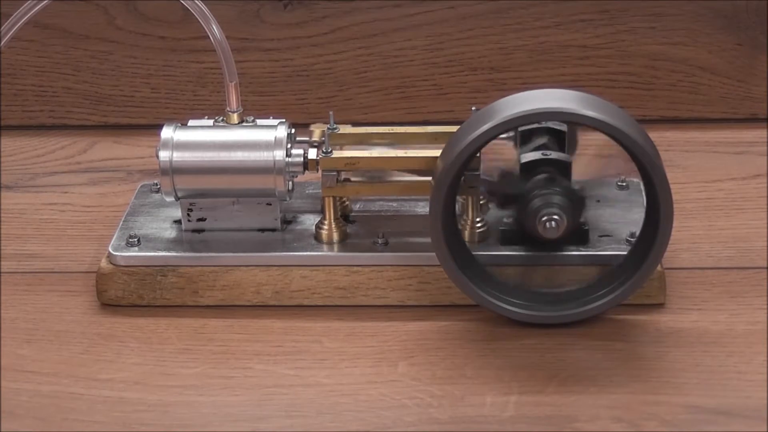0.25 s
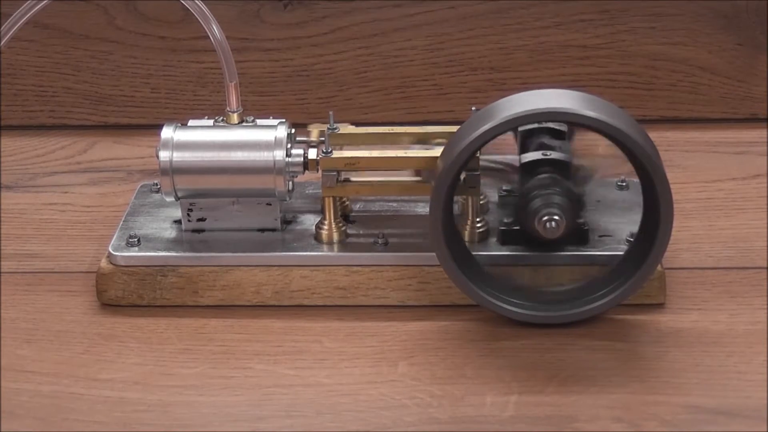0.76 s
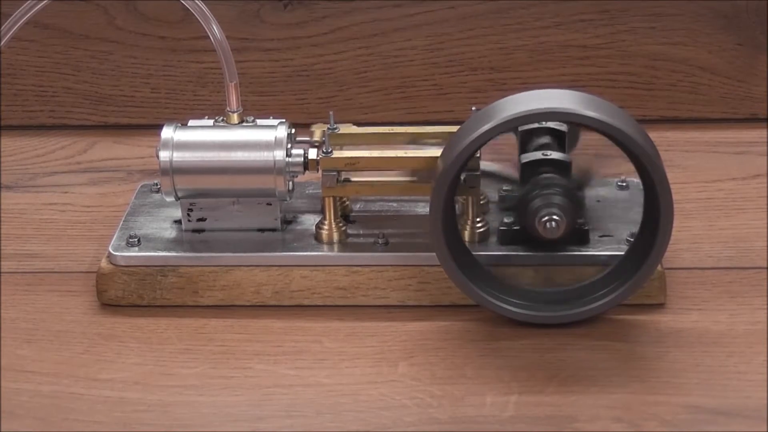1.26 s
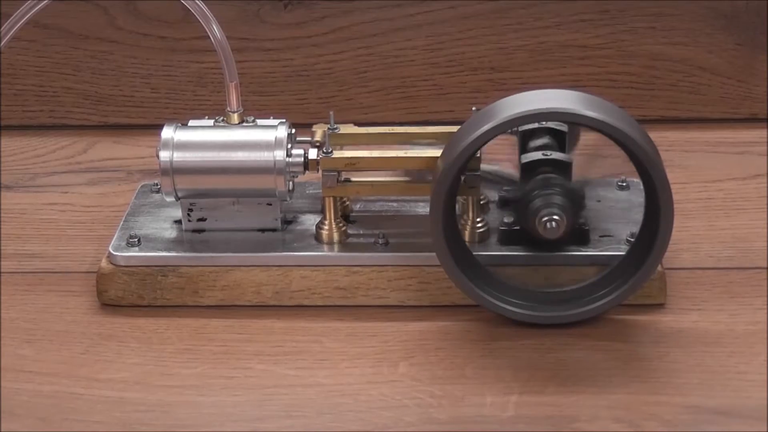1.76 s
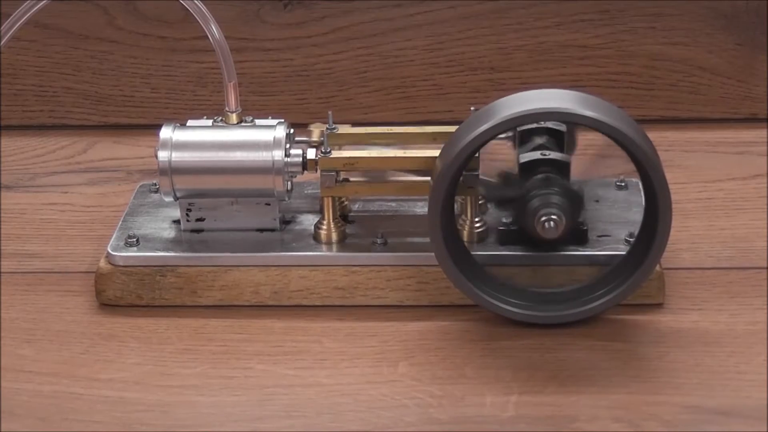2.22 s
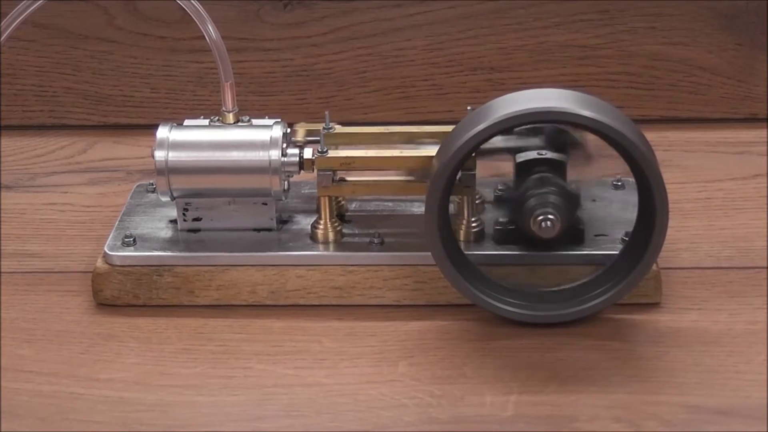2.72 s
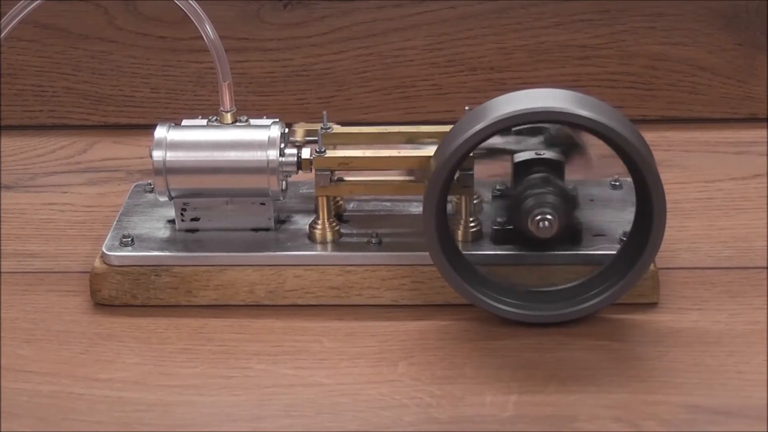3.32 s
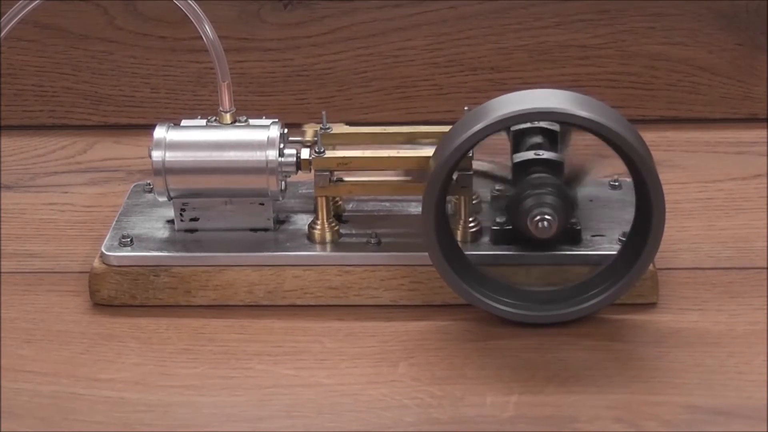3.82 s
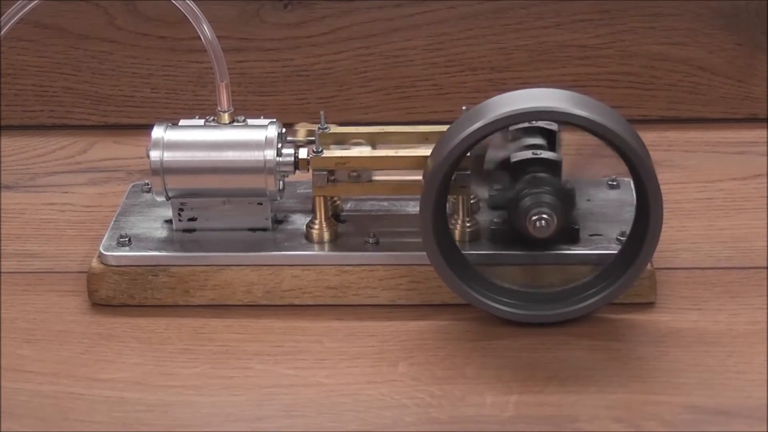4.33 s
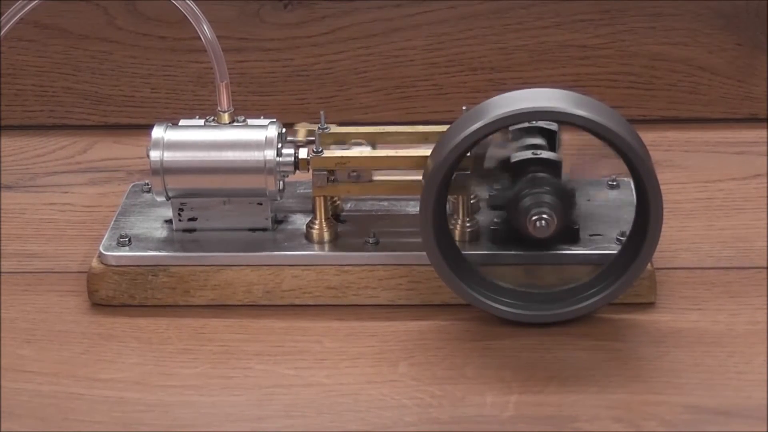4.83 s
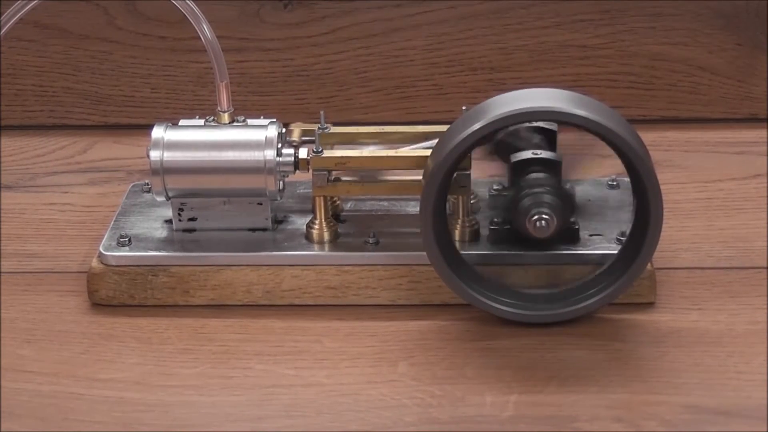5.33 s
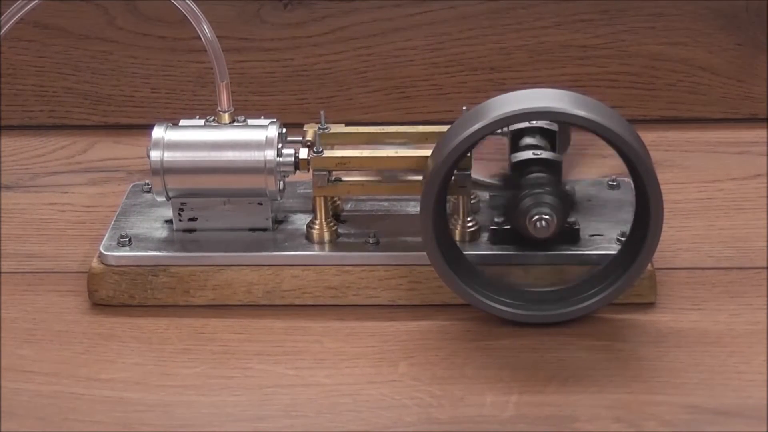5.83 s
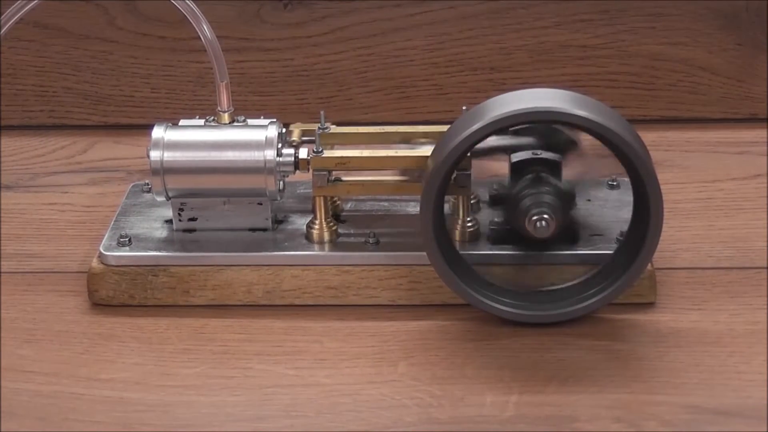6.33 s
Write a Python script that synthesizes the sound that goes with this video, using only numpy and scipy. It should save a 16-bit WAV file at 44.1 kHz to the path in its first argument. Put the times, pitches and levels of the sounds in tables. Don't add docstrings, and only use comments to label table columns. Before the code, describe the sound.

From 0 s a small air-driven piston engine is already running on a wooden bench, heard very close in stereo. Each turn has two bright hissing exhaust strokes of different colour: one broad and rushing with a faint whistle around 5 to 6 kHz, the other sharper and spitting, with airy jets near 9 kHz. A steady leak fills the gaps. Once per turn loose linkage gives a hollow, low-mid wooden knock, a brief base buzz, a small metallic ring and a very high doubled tick; low bumps sometimes jolt the microphone. The pace starts near five turns per second, climbs to nearly seven by 2 s, holds until about 3.8 s, then eases to about four and a half by 6.6 s, its hisses growing more uneven and lopsided. Knocks vary slightly in strength throughout. Hose reflections give a slight hollow tint; the room tail is short. It ends still running.

```python
import sys
import numpy as np
from scipy import signal
from scipy.fft import rfft, irfft
from scipy.io import wavfile
from scipy.ndimage import uniform_filter1d

SR = 44100
rng = np.random.default_rng(int(sys.argv[2]) if len(sys.argv) > 2 else 0)


def volts_from_decibels(level):
    exponent = np.asarray(level, float) / 20
    return 10 ** exponent


def store_wav(level_fs):
    pcm = np.round(np.clip(np.atleast_2d(level_fs), -1, 1) * 32767)
    wavfile.write(sys.argv[1], SR, pcm.T.astype(np.int16))


N = 289737
TIME, HZ = np.arange(N) / SR, np.fft.rfftfreq(N, 1 / SR)


def evened(x):
    return x / np.sqrt(np.mean(x ** 2) + 1e-20)


def read(points, hz):
    f, value = np.transpose(points)
    return np.interp(np.log(hz + 1), np.log(f + 1), value)


def hiss(gain, flutter_db, flutter_s, count=2):
    white = rng.standard_normal((count, N))
    noise = evened(irfft(rfft(white) * gain, N))
    span = max(int(flutter_s * SR), 2)
    flutter = uniform_filter1d(rng.standard_normal((count, N)), span)
    flutter = evened(uniform_filter1d(flutter, span))
    return evened(noise * volts_from_decibels(flutter_db * flutter))


def peaks(modes):
    power = 0
    for hz, width_hz, db in modes:
        power = power + volts_from_decibels(2 * db) / (1 + (2 * (HZ - hz) / width_hz) ** 2) ** 1.45
    return np.sqrt(power)


# (time [s], speed [turns/s])
SPEED = [
    (0, 4.975),
    (.6, 5.704),
    (1.1, 5.898),
    (2, 6.685),
    (2.8, 6.735),
    (3.8, 6.692),
    (4.5, 6.331),
    (5.1, 6.059),
    (5.9, 5.311),
    (6.6, 4.499),
]


def crank():
    start_turns = -.376
    return start_turns + np.cumsum(np.interp(TIME, *np.transpose(SPEED))) / SR


# (time [s], favour to front end [dB], supply pressure [dB])
FAVOUR = [(0, -0.5, 0.5), (.5, .5, 0.3), (.95, -2, -1), (1.25, 2, 0.5), (1.7, 0.5, -.5), (2.1, 2.5, -.5),
          (2.45, .5, .6), (3.1, 1, 0.3), (3.6, 1.5, .1), (3.9, -0.5, -1), (4.25, 0.5, 1.2), (4.7, 0.5, -.2),
          (5.05, -2.5, 0.2), (5.3, -2.5, 1.4), (5.7, -1.5, .5), (6.05, -4.5, -1.1), (6.3, -2.5, 0.2),
          (6.6, -6.5, -0.3)]


def vent(db, favour, scatter_db, flow, first_turns):
    half_turns = 2 * (crank() - first_turns)
    stroke = (half_turns // 2).astype(int) + 2
    s, favour_db, supply_db = np.transpose(FAVOUR)
    air_db = np.interp(TIME, s, favour * favour_db + supply_db)
    chance_db = scatter_db * rng.standard_normal(stroke.max() + 1)[stroke]
    flow_db = np.interp(half_turns % 2, *np.transpose(flow))
    return volts_from_decibels(db + air_db + chance_db + flow_db)


# (time since opening [half turns], level [dB])
FRONT_FLOW = [(0, -18), (.02, 0.5), (.12, -1), (.65, 1.5), (.8, -0.5), (.95, -5), (1.3, -8.5), (2, -16.5)]
PASSAGE_FLOW = [(0, -37), (.08, -7), (.25, 0.5), (.62, 1.5), (.8, -6), (1.05, -7), (1.6, -19), (2, -21)]
BACK_FLOW = [(0, -7), (.05, -0.5), (.25, 1.5), (.55, -3.5), (.8, -1.5), (.95, -7.5), (1.1, -8), (2, -35)]
JET_FLOW = [(0, -37), (.04, 7), (.12, 2.5), (.45, -3.5), (.7, 1), (.8, 3.5), (.9, -17), (1.05, 0), (2, -61)]
# (frequency [Hz], density [dB per Hz])
FRONT_BODY = [(150, -41), (900, -15.5), (1400, -10.5), (2050, -8), (2350, -1.5), (2600, 0.5), (3050, -3),
              (3400, 2), (3700, 1), (4400, 0), (5200, -6), (6800, -1.5), (8000, -17.5)]
FRONT_TREBLE = [(6200, -20), (7200, -3.5), (8800, -3), (9700, 3.5), (10500, -2), (11500, -1.5),
                (12700, -2.5), (14000, -6.5), (14900, -9.5), (15600, -9)]
BACK_BODY = [(150, -10.5), (1000, -13), (1400, -13), (2050, -15.5), (2350, -0.5), (2600, 1.5), (3050, -2),
             (3450, 4.5), (3800, 2.5), (4400, -2), (5000, -8), (6800, -5.5), (8000, -8.5)]
BACK_TREBLE = [(6200, -15.5), (7300, 7.5), (8300, 1), (10500, -2), (11500, 6), (12800, -4), (14000, -11),
               (14900, -5), (15600, 2.5)]
LEAK = [(60, -20), (150, -13), (400, -7.5), (1000, -17), (2000, -9), (3600, -12.5), (5500, -7.5),
        (7000, -8.5), (9200, 4.5), (11500, -6), (14000, -8.5), (14900, -22), (15600, -23)]
# (frequency [Hz], width [Hz], level [dB])
PASSAGE = [(5824, 220, -1.5), (5536, 340, -4), (6095, 300, -2.5), (5105, 46, 2.5)]
JET = [(9680, 570, -9.5), (9880, 250, -8), (9030, 140, -7.5), (8120, 150, -11)]


def exhaust():
    front = vent(-38, -0.21, 0.43, FRONT_FLOW, 0) * hiss(volts_from_decibels(read(FRONT_BODY, HZ)), 1.5, 0.0037)
    front += vent(-35.5, 0.14, 0.32, FRONT_FLOW, -.025) * hiss(volts_from_decibels(read(FRONT_TREBLE, HZ)), 1.5, 0.0028)
    front += vent(-39.5, 0.88, 0.62, PASSAGE_FLOW, 0) * hiss(peaks(PASSAGE), 0.95, 0.004)
    back_turns = 0.493
    back = vent(-39.5, -.3, 0.86, BACK_FLOW, back_turns) * hiss(volts_from_decibels(read(BACK_BODY, HZ)), 0.71, 0.0021)
    back += vent(-41.0, 0.074, 1.8, BACK_FLOW, back_turns) * hiss(volts_from_decibels(read(BACK_TREBLE, HZ)), 0.94, 0.0014)
    back += vent(-38.5, -0.34, 0.87, JET_FLOW, back_turns) * hiss(peaks(JET), 1.2, 0.0022)
    leak = volts_from_decibels(-41) * hiss(volts_from_decibels(read(LEAK, HZ)), 2.95, 0.032)
    return front + back + leak


def ring(modes, rise_s=1e-5, length_s=.3):
    t = np.arange(int(length_s * SR)) / SR
    sines = sum(volts_from_decibels(db - 60 * t / t60) * np.sin(2 * np.pi * hz * t) for hz, db, t60 in modes)
    return (1 - np.exp(-t / rise_s)) * sines


def blows(seconds, sizes):
    train = np.zeros(N)
    at = np.clip((np.asarray(seconds) * SR).astype(int), 0, N - 1)
    np.add.at(train, at, sizes)
    return train


# (frequency [Hz], width [Hz], level [dB])
RATTLE = [(408, 150, -2.5), (514, 164, 0), (1270, 2000, -11.5)]


def rattle(s, upper_db):
    last = np.searchsorted(s, TIME) - 1
    since_s = TIME - s[last]
    hold_turns, stop_turns = 0.46, 0.11
    past_turns = since_s * np.interp(TIME, *np.transpose(SPEED)) - hold_turns
    shake = volts_from_decibels(upper_db[last] + 6 - 60 * since_s / 0.73)
    shake = shake * (1 - np.exp(-since_s / 0.0084)) / (1 + np.exp(past_turns / stop_turns))
    return volts_from_decibels(-6) * shake * hiss(peaks(RATTLE), 2.6, 0.01, count=1)[0]


# (time [s], crosshead level [dB])
KNOCKS = [(-.06, -50), (0.687, -38.5), (1.0225, -43.5), (1.203, -53), (1.993, -44.5), (2.1433, -42),
          (2.4406, -43), (2.7347, -39.5), (3.034, -42), (3.9272, -51), (4.083, -52), (5.0334, -40),
          (5.193, -45), (5.3654, -39.5), (5.546, -46), (6.5167, -44.5)]
# (frequency [Hz], level [dB], t60 [s])
CROSSHEAD = [(1213, 3.5, 0.08), (1415, 10.5, 0.023), (1623, 1.5, 0.062), (1700, -3.5, 0.05),
             (2670, 2, 0.025), (3620, 1, 0.014)]
TICK = [(13170, -0.5, 0.0038), (12900, -6, .004), (12300, -5, .004), (13900, -11, .003), (11500, -16, .003),
        (7000, -27, .003)]
# (frequency [Hz], level [dB], t60 [s])
BASE_AGAINST = [(328.3, -6.5, 0.19), (413.6, -1.5, 0.21), (816, -14.5, 0.13)]
BASE_WITH = [(396, -11, 0.13), (451.2, -13, 0.4), (494.6, -7.5, 0.33), (553, -7.5, 0.12),
             (615.6, -5.5, 0.098), (152.4, -14, 0.22)]
JOLT_LAG_S = 0.00067


def knocks():
    jolt_tick_db = 2
    rows = [(s, db, 0) for s, db in KNOCKS]
    rows += [(row[0] - JOLT_LAG_S, row[1], jolt_tick_db) for row in JOLTS]
    s, head_db, extra_db = np.transpose(sorted(rows))

    def follow(usual_db, slope, scatter_db):
        return usual_db + slope * (head_db + 46) + scatter_db * rng.standard_normal(len(s))

    base_db = follow(-46, 0.16, 1.3)
    upper_db = follow(-45.5, 0.11, 0.74)
    tick_db = follow(-37.5, -0.18, 1.6)
    answer_s = s[:-1] + 0.51 * np.diff(s)
    answer = volts_from_decibels(2.0 * rng.standard_normal(len(answer_s)))
    heard = s > 0

    base = blows(s - .0008, heard * volts_from_decibels(base_db + 7.0))
    base += blows(answer_s, volts_from_decibels(-73) * answer)
    upper = blows(s - .0008, heard * volts_from_decibels(upper_db + 6.0))
    wood = signal.oaconvolve(upper, ring(BASE_WITH, 0.0023))[:N]
    wood -= signal.oaconvolve(base, ring(BASE_AGAINST, 0.0009))[:N]
    wood += rattle(s, upper_db)

    head = blows(s, heard * volts_from_decibels(head_db - 5.5))
    head += blows(answer_s, volts_from_decibels(-61) * answer)
    tick_size = heard * volts_from_decibels(tick_db + extra_db)
    tick = blows(s, volts_from_decibels(7.0) * tick_size)
    tick += blows(s + 0.0012, volts_from_decibels(7.5) * tick_size)
    tick += blows(answer_s, volts_from_decibels(-46.5) * answer)
    metal = signal.oaconvolve(head, ring(CROSSHEAD))[:N] + signal.oaconvolve(tick, ring(TICK))[:N]
    return wood, metal


def push(rise_s, cut_hz):
    u = np.arange(4000) / SR / rise_s
    x = signal.lfilter(*signal.butter(2, cut_hz / (SR / 2), "high"), u ** 1.4 * np.exp(-u))
    return x / x.max()


# (time [s], crosshead level [dB], left [pressure, full scale 1], right [pressure, full scale 1])
JOLTS = [(0.1338, -43.5, 0.024, -0.029), (0.3275, -48, 0.05, -0.069), (0.5108, -38, 0.021, -0.042),
         (0.8553, -48, 0.039, -0.044), (1.3656, -60, -0.1, 0.087), (1.529, -58, 0.02, -0.018),
         (1.6847, -54, 0.073, -0.087), (1.839, -50, 0.025, -0.027), (2.2862, -54, 0.008, -0.008),
         (2.5888, -48, -0.00054, -0.025), (2.8855, -38.5, -0.048, 0.041), (3.1815, -39.5, -0.061, 0.055),
         (3.3272, -61, 0.085, -0.1), (3.4829, -47.5, 0.029, -0.035), (3.6259, -44.5, 0.075, -0.095),
         (3.7808, -51, 0.007, -0.0043), (4.2378, -45, -0.0025, -0.00018), (4.3917, -42.5, -0.0027, 0.0011),
         (4.5498, -41.5, 0.038, -0.047), (4.7078, -48, 0.034, -0.04), (4.8697, -39.5, 0.072, -0.08),
         (5.7188, -51, -0.1, 0.093), (5.9113, -46.5, -0.0096, -0.018), (6.0995, -43, 0.012, -0.012),
         (6.3073, -65, 0.057, -0.075)]


def jolts():
    s, _, left, right = np.transpose(JOLTS)
    rocking = signal.oaconvolve(blows(s, (left - right) / 2), push(0.00057, 78))[:N]
    together = volts_from_decibels(6.0) * signal.oaconvolve(blows(s, (left + right) / 2), push(0.00081, 52))[:N]
    return np.array([together + rocking, together - rocking])


# (delay [s], share [ratio])
ECHOES = [
    (.0059, -.45),
    (.0118, .18),
]
# (frequency [Hz], level [dB])
RETURN = [(300, -27.5), (2000, -6), (6500, -2.5), (9000, -12), (16000, -16)]
# (frequency [Hz], side minus mid [dB])
APART = [(100, -13.5), (250, -33), (450, -18.5), (1000, -24), (1500, -21.5), (2700, -14.5), (3700, -13.5),
         (5000, -20), (5900, -16), (7000, -29), (8500, -19), (10000, -19), (11500, -6.5), (14500, -2.5)]
# (frequency [Hz], left minus right [dB])
LEAN = [(300, 0.5), (1500, -1), (5000, -0.9), (8000, 0), (15000, 3.5)]


def scene():
    direct, scattered = exhaust()
    wood, metal = knocks()
    t = np.arange(SR // 4) / SR
    t60_s = np.array([[.25], [.3], [.04]])
    tails = rng.standard_normal((3, len(t))) * volts_from_decibels(-60 * t / t60_s)
    room, bench, scatter = rfft(tails / np.linalg.norm(tails, axis=1, keepdims=True), N)
    hose = sum(share * np.exp(-2j * np.pi * HZ * delay_s) for delay_s, share in ECHOES)
    space = 1 + volts_from_decibels(read(RETURN, HZ)) * (hose + volts_from_decibels(-6.5) * room)
    mid = rfft(direct + metal) * space + rfft(wood) * (1 + volts_from_decibels(-12.5) * bench)
    side = rfft(scattered) * space
    side += rfft(volts_from_decibels(9.0) * wood + metal) * scatter / abs(scatter) ** 0.62
    side *= volts_from_decibels(read(APART, HZ))
    lean = volts_from_decibels(read(LEAN, HZ) / 2)
    low_cut_hz = 110
    low_cut = 1 / np.sqrt(1 + (low_cut_hz / (HZ + 1)) ** 8)
    pair = np.array([(mid + side) * lean, (mid - side) / lean])
    return irfft(low_cut * pair, N) + jolts()


def top_cut(x):
    return signal.sosfilt(signal.butter(12, 16860, fs=SR, output="sos"), x)


def record(dry):
    edge_hz = 15760
    low_pass = signal.firwin(1535, edge_hz, window=("kaiser", 9), fs=SR)
    limited = signal.oaconvolve(dry, low_pass[None], "same")
    return top_cut(limited)


dry = scene()
out = record(dry)
store_wav(out)
```